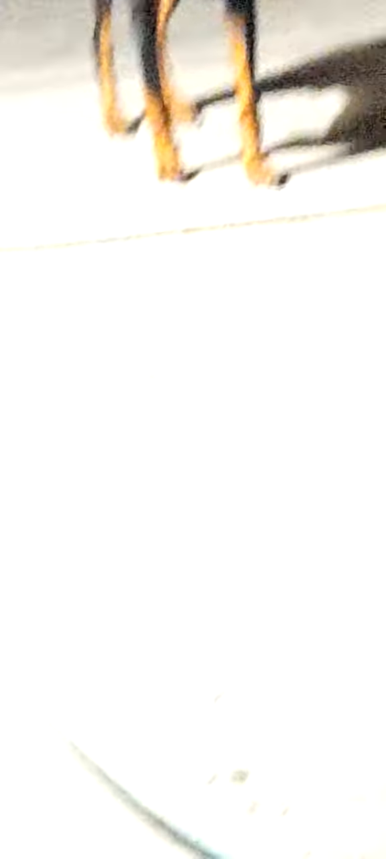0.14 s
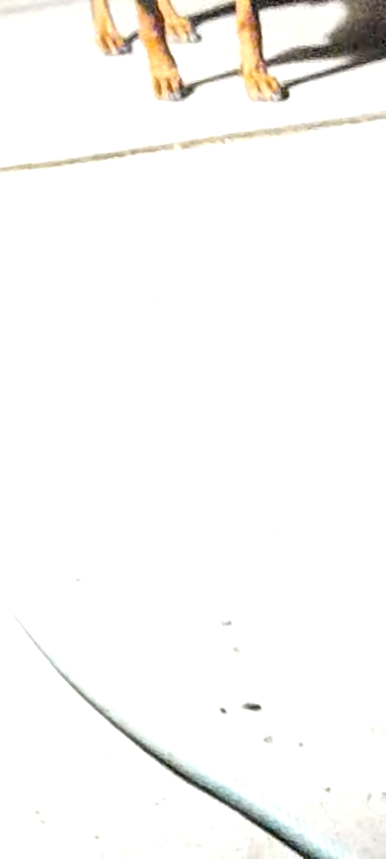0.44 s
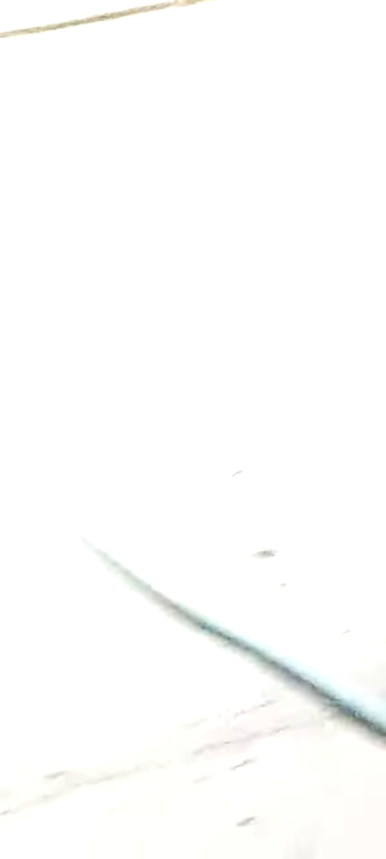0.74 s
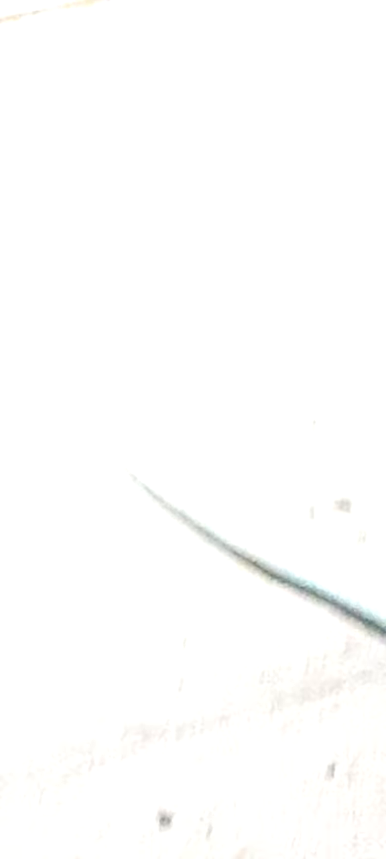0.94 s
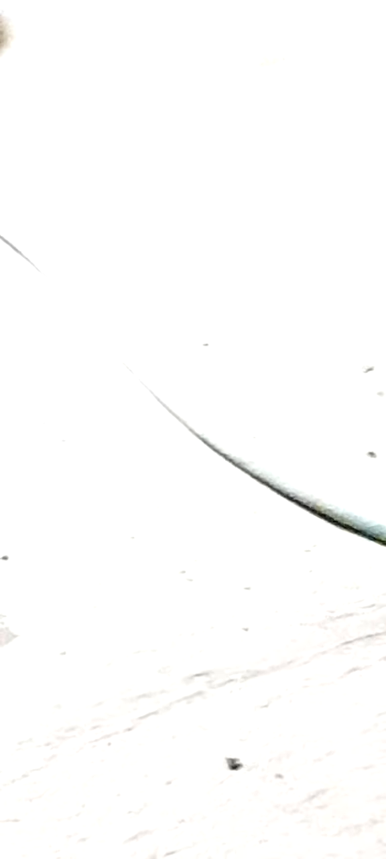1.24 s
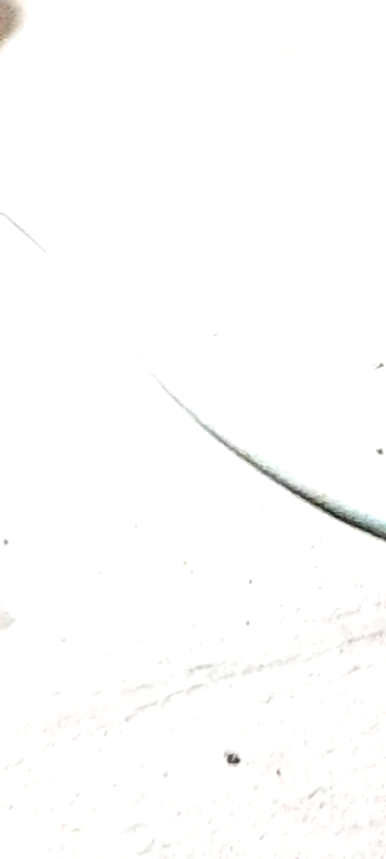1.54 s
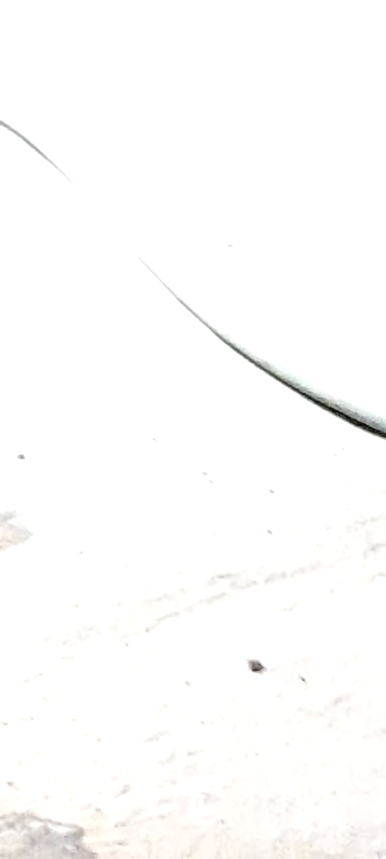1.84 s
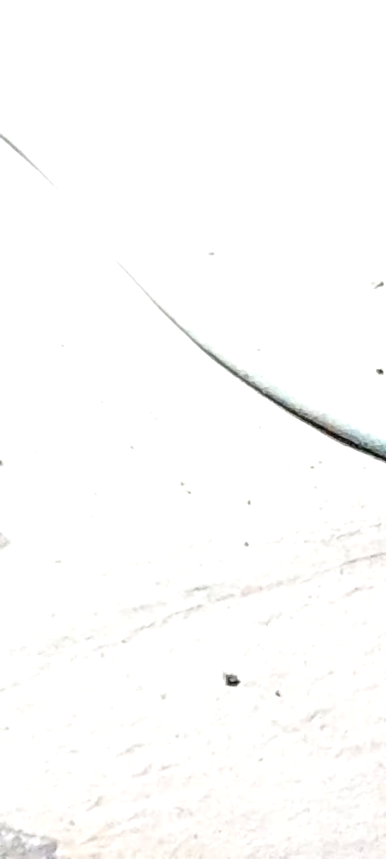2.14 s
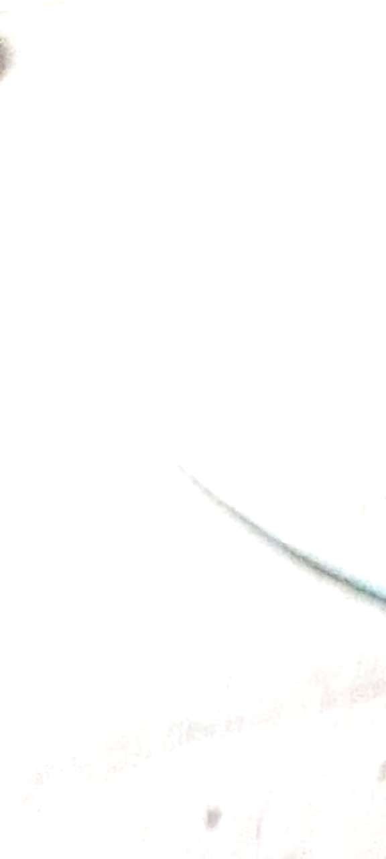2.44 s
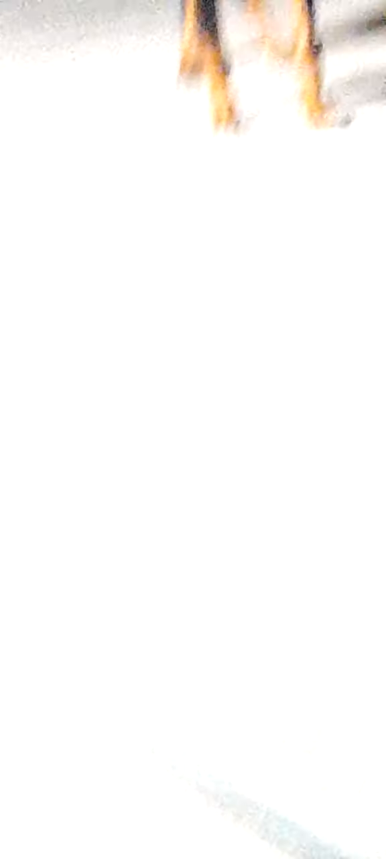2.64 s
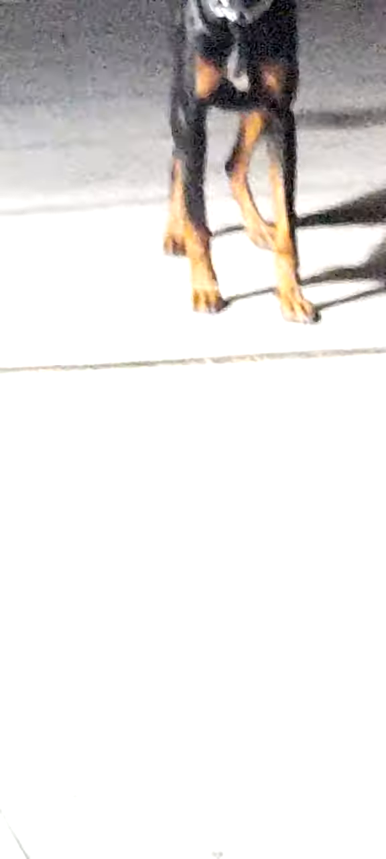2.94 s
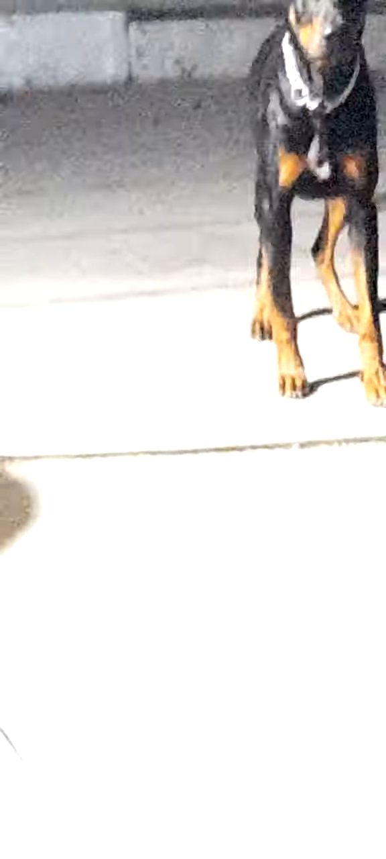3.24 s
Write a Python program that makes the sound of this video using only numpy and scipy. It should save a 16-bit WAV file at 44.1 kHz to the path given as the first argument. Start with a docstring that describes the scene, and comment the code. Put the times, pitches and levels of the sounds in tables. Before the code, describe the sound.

A ball thumps and bobbles on concrete over a low rumble, ending with a close bump.

```python
"""A concrete yard at night, hand-held stereo microphone, distant traffic rumbling throughout.
Close by, a ball thumps and bobbles, each contact a hollow ring with a scrape of grit. After a lull it
lands at 1.8 s with a sharp slap that nearby walls return faintly. Small ticks, scuffs and a bright swish
follow. At 3.3 s come a few hard clacks, then a loud, hollow bump close to the microphone."""
import sys
import numpy as np
from scipy import signal
from scipy.fft import rfft, irfft
from scipy.io import wavfile
from scipy.ndimage import uniform_filter1d

SR = 44100
rng = np.random.default_rng(int(sys.argv[2]) if len(sys.argv) > 2 else 0)


def put_to_file(sound):
    """Save the sound as 16-bit audio at rate SR, in the file named by the first command-line argument."""
    columns = np.atleast_2d(sound).T  # one column per channel
    safe = np.clip(columns, -1, 1)
    whole_steps = np.round(safe * 32767)
    wavfile.write(sys.argv[1], SR, whole_steps.astype(np.int16))


N = 149940
T = np.arange(SR // 3) / SR  # time within one short sound, s

# colour of sound scattered off nearby surfaces: f/Hz, level/dB
SCATTER_COLOUR = [(200, -14.5), (1000, 8.5), (1800, 8.5), (3800, -2.5), (7000, -13), (10000, -19),
                  (14000, -27), (16000, -16.5)]


def amp(db):
    """Decibels to gain."""
    return 10 ** (np.asarray(db) / 20)


def unit(x):
    """Scales to rms 1."""
    return x / np.sqrt(np.mean(x ** 2) + 1e-20)


def read(points, hz):
    """Reads a table along a log-frequency axis."""
    f, value = np.transpose(points)
    return np.interp(np.log(hz + 1), np.log(f + 1), value)


def add(mix, s, sound):
    """Mixes a sound in at s seconds."""
    part = mix[round(s * SR):][:len(sound)]
    part += sound[:len(part)]


def tint(x, colour):
    """Filters by a table of f/Hz, level/dB."""
    n = x.shape[-1]
    gain = amp(read(colour, np.fft.rfftfreq(2 * n, 1 / SR)))
    return irfft(rfft(x, 2 * n) * gain)[..., :n]


def burst(colour, db, rise, t60, hold=0):
    """A puff of coloured noise that rises, holds and decays; times in seconds."""
    envelope = np.minimum(T / rise, 1) ** 2 * amp(-60 * np.maximum(T - rise - hold, 0) / t60)
    return amp(db) * envelope * unit(tint(rng.standard_normal(len(T)), colour))


def ring(hz, t60):
    """One mode, dying by 60 dB in t60 seconds."""
    return np.sin(2 * np.pi * hz * T) * np.exp(-np.log(1000) * T / t60)


def traffic():
    """Far-off traffic: a rumble that drifts in patches, its bass alike at both microphones."""
    # colour of the rumble: f/Hz, level/dB
    colour = [(15, -67.5), (28, -34.5), (42, -5.5), (62, 1.5), (100, -2.5), (160, -8), (250, -9),
              (400, -16), (700, -21.5), (1100, -23), (1700, -26.5), (2400, -40), (4400, -57),
              (16000, -57.5)]
    # likeness of left and right: f/Hz, correlation
    likeness = [(60, 1), (150, 0.91), (300, 0.894), (600, 0.383), (1200, 0.106), (16000, 0)]
    hz, frames = np.fft.rfftfreq(4096, 1 / SR), N // 1024 + 5
    a, b, c, d, patches = rng.standard_normal((5, frames, len(hz)))
    patches = uniform_filter1d(patches, size=4, axis=0)  # smooth over time
    drift_db = 1.5 * unit(uniform_filter1d(patches, size=24, axis=1))  # and over frequency
    same = np.clip(read(likeness, hz), -1, 1)
    left = a + 1j * b
    right = same * left + np.sqrt(1 - same ** 2) * (c + 1j * d)
    spectra = np.array([left, right]) * amp(read(colour, hz) + drift_db)
    rumble = signal.istft(spectra.transpose(0, 2, 1), nperseg=4096, noverlap=3072)[1][:, :N]
    return amp(-43) * unit(rumble)


def hiss():
    """A faint hiss that comes and goes, a little stronger on the right."""
    # colour of the hiss: f/Hz, level/dB
    colour = [(400, 2), (1600, 8.5), (2500, 1), (4000, -2.5), (6500, -7.5), (10000, -15), (14000, -11.5),
              (16000, -21.5)]
    # its rise and fall: t/s, level/dB
    levels = [(0, -51.5), (.06, -50.5), (.2, -58), (.44, -56), (.62, -64), (.9, -70), (1.3, -72.5),
              (1.78, -102), (1.9, -58.5), (2.0, -69.5), (2.2, -69.5), (2.4, -63), (2.6, -64), (2.75, -81.5),
              (3.07, -74), (3.15, -67), (3.4, -56.5)]
    envelope = amp(np.interp(np.arange(N) / SR, *np.transpose(levels)))
    return unit(tint(rng.standard_normal((2, N)), colour)) * envelope * amp([[-1.5], [1.2]])


def bass_swells():
    """The bass swells three times, in the centre."""
    # swells: t/s, level/dB, rise/s, t60/s
    swells = [(0.241, -46, 0.027, 0.28), (0.541, -46, 0.062, 0.51), (2.53, -40.5, 0.0265, 0.243)]
    # their colour: f/Hz, level/dB
    colour = [(25, -45.5), (45, -9.5), (63, -2.5), (85, -8.5), (130, -12), (220, -22), (600, -52.5),
              (2000, -81)]
    out = np.zeros(N)
    for s, db, rise, t60 in swells:
        add(out, s, burst(colour, db, rise, t60, hold=0.103))
    return out


def walls(slap_s):
    """The slap comes back off nearby walls, differently at each microphone."""
    out = np.zeros((2, N))
    for channel, db in zip(out, (-39, -36)):
        add(channel, slap_s, burst(SCATTER_COLOUR, db, rise=0.0039, t60=0.173))
    return out


def ground():
    """Ticks and scuffs on the concrete, and one bright swish that swells and stops short."""
    # small ticks: t/s, level/dB
    ticks = [(.0493, -51.5), (0.148, -50.5), (0.161, -47), (.18, -46), (2.187, -47), (2.2222, -44.5),
             (2.259, -52), (2.265, -51), (2.3036, -37.5), (2.353, -46.5), (2.396, -47.5), (2.404, -46.5)]
    # scuffs: t/s, level/dB, rise/s, t60/s
    scuffs = [(0.326, -41, 0.00174, 0.0154), (1.093, -59, 0.00256, 0.181), (2.03, -63.5, 0.0145, 0.225),
              (2.11, -60.5, 0.0166, 0.116), (2.503, -61, 0.0072, 0.083), (2.605, -58.5, 0.0336, 0.29),
              (3.098, -60, 0.00326, 0.178), (3.205, -51.5, 0.0275, 0.038)]
    # colours of tick, scuff and swish: f/Hz, level/dB
    tick_colour = [(900, -21.5), (1800, -13), (2200, 4.5), (3600, 5.5), (4500, -16), (7000, -26),
                   (10000, -38.5), (16000, -33)]
    scuff_colour = [(900, -3), (2500, 3), (4700, -2.5), (7500, -8.5), (10000, -20), (16000, -10)]
    swish_colour = [(1200, -43.5), (3400, -1), (4400, -14), (5700, 6.5), (7400, -11), (9500, -12.5),
                    (12000, -2), (14500, -4.5), (16000, -7)]
    out = np.zeros(N)
    for s, db in ticks:
        add(out, s, burst(tick_colour, db, rise=0.00104, t60=0.0197))
    for s, db, rise, t60 in scuffs:
        add(out, s, burst(scuff_colour, db, rise, t60))
    add(out, 2.517, burst(swish_colour, db=-38, rise=0.018, t60=0.0367, hold=0.00605))
    return out


def clacks():
    """A small hard object near the microphone rings briefly at each knock, with a short scatter."""
    # knocks: t/s, level/dB
    knocks = [(3.2853, -34.5), (3.2897, -32), (3.3034, -26), (3.3094, -35), (3.3152, -32), (3.3344, -15.5),
              (3.3379, -24)]
    # the object's modes: f/Hz, relative level/dB, t60/s
    modes = [(1593, -6.5, 0.032), (1766, -3.5, 0.011), (2266, -15, 0.0084), (2800, -43.5, 0.0069),
             (4015, -24.5, 0.0096), (4780, -27.5, 0.0123), (6540, -34.5, 0.0092), (8200, -51, 0.011)]
    out = np.zeros(N)
    ringing = sum(amp(db) * ring(hz, t60) for hz, db, t60 in modes)
    for s, db in knocks:
        scatter = burst(SCATTER_COLOUR, db=-19.5, rise=0.000185, t60=0.0904)
        add(out, s, amp(db) * (ringing + scatter))
    return out


def ball_and_bump(slap_s):
    """The ball's contacts and the last close bump each ring hollow, rattle and scrape; the ball slaps once."""
    # contacts of the ball, then from 3.37 s the bump close to the microphone:
    # t/s, body level/dB, pitch f/Hz, ring t60/s, low push/dB, rattle/dB, grit/dB
    contacts = [(0.2113, -3.5, 297, 0.0262, -22, -37, -38.5),
                (.2183, -8.5, 669.2, 0.01806, -17, -48, -60.5),
                (.2241, -9.5, 367.7, 0.0253, -27.5, -52.5, -44),
                (0.246, -35, 324.2, 0.207, -16.5, -41.5, -67.5),
                (.3512, -9.5, 285.7, 0.0246, -28.5, -33, -43.5),
                (0.3594, -12.5, 241, 0.0498, -12.5, -36.5, -47), (0.37, -28, 239.1, 0.168, -17.5, -48, -65),
                (0.3835, -27.5, 199.8, 0.16, -18, -58.5, -67),
                (.4736, -33, 371.5, 0.097, -24.5, -38.5, -50.5), (.4841, -21, 479, 0.0318, -21, -39, -52),
                (0.4878, -23.5, 337.7, 0.03, -17.5, -38.5, -51.5),
                (0.948, -38, 420.4, 0.066, -30, -46.5, -58.5),
                (1.8058, -20.5, 444, 0.0447, -29.5, -44, -48.5),
                (1.8219, -22, 212, 0.0967, -15.5, -34.5, -43),
                (1.8306, -26, 99.5, 0.092, -31.5, -48, -54.5),
                (1.8514, -22.5, 299.3, 0.026, -39.5, -43, -45),
                (3.368, -3.5, 311.2, 0.0545, -18.5, -24.5, -35.5),
                (3.3773, 6, 354.1, 0.02186, -8.5, -24, -46.5), (3.3824, -2, 417, 0.0298, -19, -25.5, -48),
                (3.3924, 3, 349, 0.0213, -11.5, -33.5, -50.5)]
    # modes of the hollow ring: multiple of the pitch, relative level/dB, multiple of the ring t60
    modes = [(0.682, -13.5, 1.653), (1.002, 2, 1.019), (1.379, -12.5, 1.338), (2.099, -23, 2.02)]
    # colours of rattle, grit and slap: f/Hz, level/dB
    rattle_colour = [(100, -16.5), (450, -3), (730, 1.5), (950, 4), (1250, -2.5), (1560, 0), (1900, -6),
                     (2300, -19), (6000, -38.5)]
    grit_colour = [(800, -29), (2000, -1.5), (3400, 10.5), (4800, -4.5), (6400, 1), (9000, -12),
                   (12000, -4), (16000, -19.5)]
    slap_colour = [(200, -24.5), (1000, 3.5), (1700, 0.5), (2500, -1), (3700, 5), (5000, -6.5),
                   (6300, -0.5), (8000, -17.5), (10000, -16.5), (12500, -10.5), (14500, -8.5),
                   (16000, -21.5)]
    onset = 1 - np.exp(-(T / 0.002045) ** 2)  # a soft contact builds over about 2 ms
    out = np.zeros(N)
    for s, db, hz, t60, push_db, rattle_db, grit_db in contacts:
        body = sum(amp(mode_db) * ring(hz * ratio, t60 * stretch) for ratio, mode_db, stretch in modes)
        push = amp(push_db) * ring(hz=146.3, t60=0.0336)
        ping = amp(rattle_db - 0.5) * ring(hz=1541, t60=0.083)
        rattle = burst(rattle_colour, rattle_db, rise=0.00477, t60=0.0763)
        grit = burst(grit_colour, grit_db, rise=0.00263, t60=0.0435)
        add(out, s, (amp(db) * body + push) * onset + ping + rattle + grit)
    add(out, slap_s, burst(slap_colour, db=-24.5, rise=0.0001, t60=0.0159, hold=0.00291))
    return out


def scene():
    """Close sounds reach the right microphone first; reflections and background surround them."""
    # shading of the left microphone, which faces away: f/Hz, level/dB
    left_shade = [(100, -1), (350, -4), (650, -1), (1300, -5), (2200, -3), (5000, -6), (8300, -2),
                  (10500, -11), (16000, -13)]
    slap_s, left_lag_s = 1.819, 0.00043
    near = ball_and_bump(slap_s) + ground() + clacks()
    delayed = np.zeros(N)
    add(delayed, left_lag_s, near)
    left = tint(delayed, left_shade)
    return np.array([left, near]) + walls(slap_s) + traffic() + hiss() + bass_swells()


def record(dry):
    """The recorder cuts off the treble above 16.1 kHz."""
    lowpass = signal.firwin(511, 16100, window=("kaiser", 9), fs=SR)
    return signal.oaconvolve(dry, lowpass[None], "same")


dry = scene()
out = record(dry)
put_to_file(out)
```